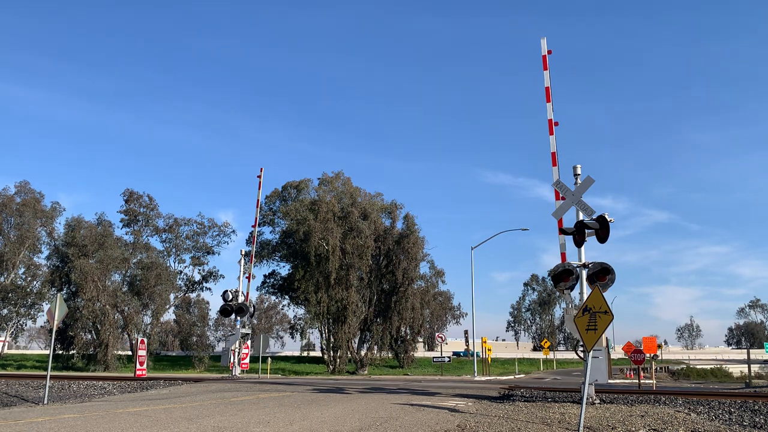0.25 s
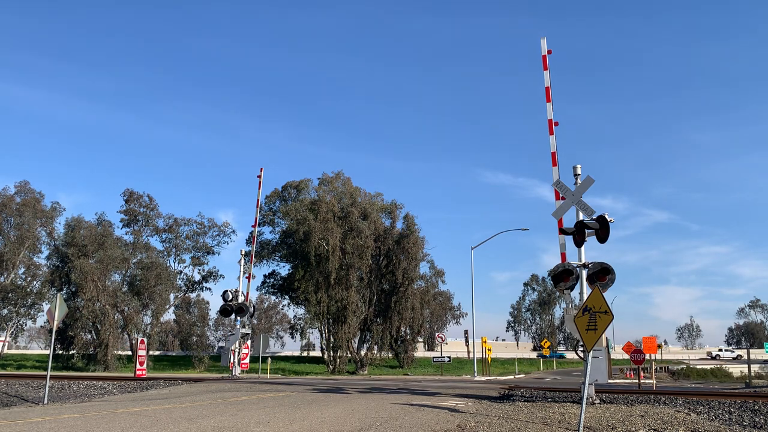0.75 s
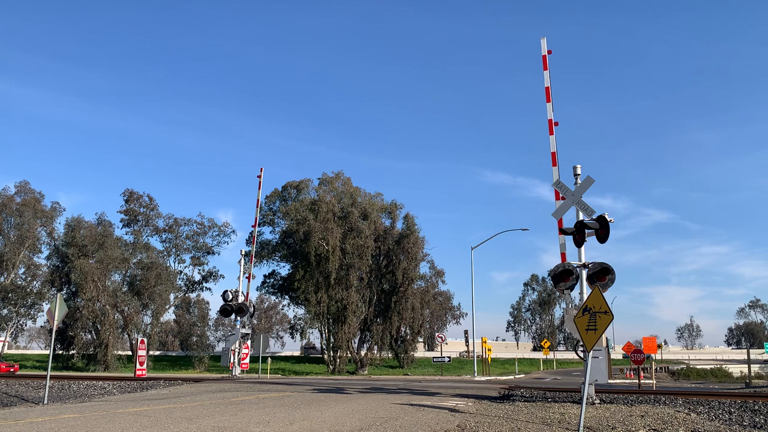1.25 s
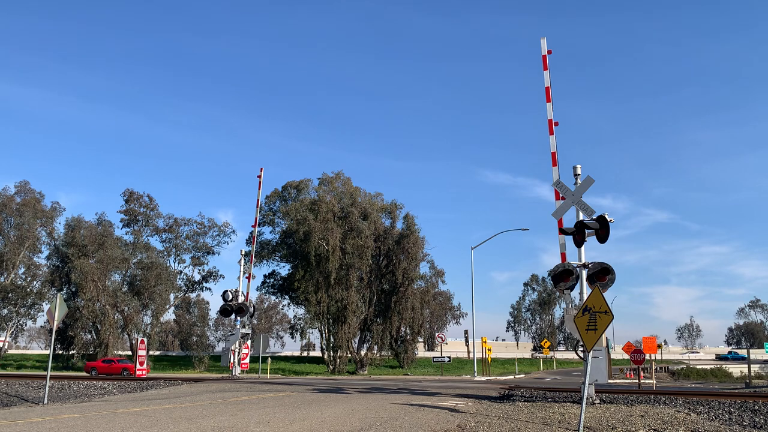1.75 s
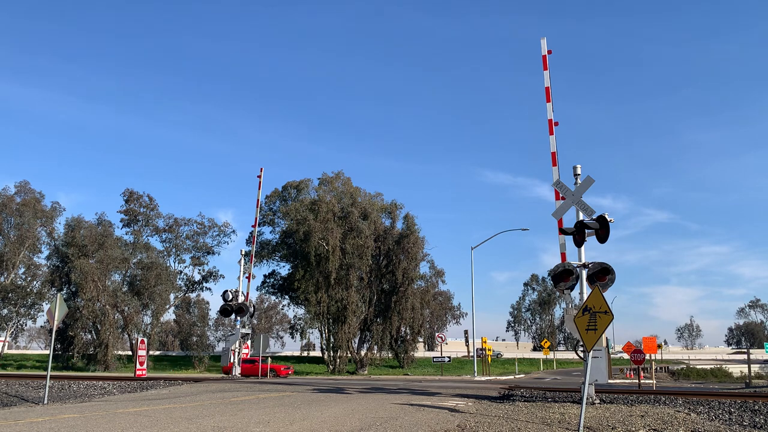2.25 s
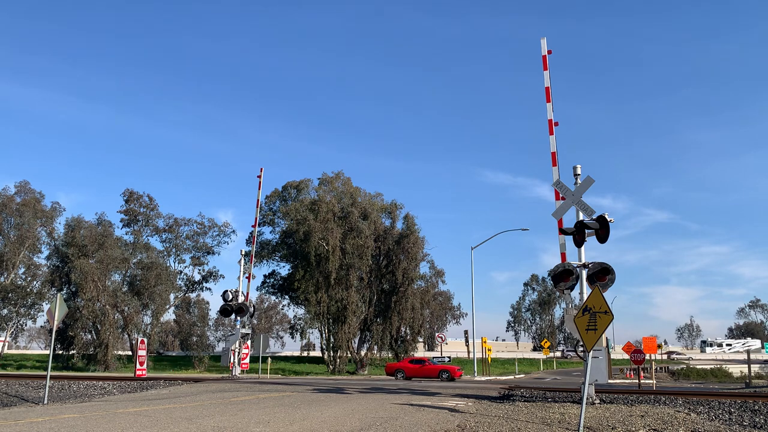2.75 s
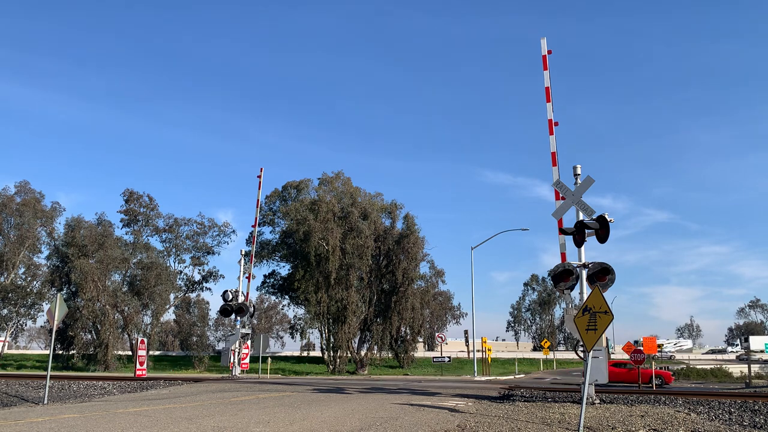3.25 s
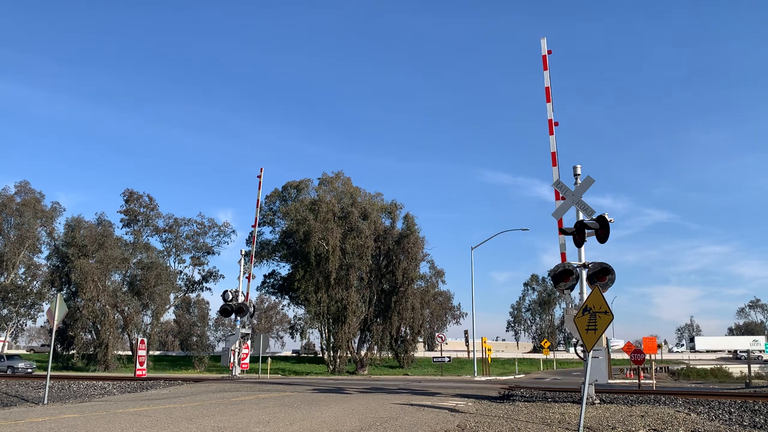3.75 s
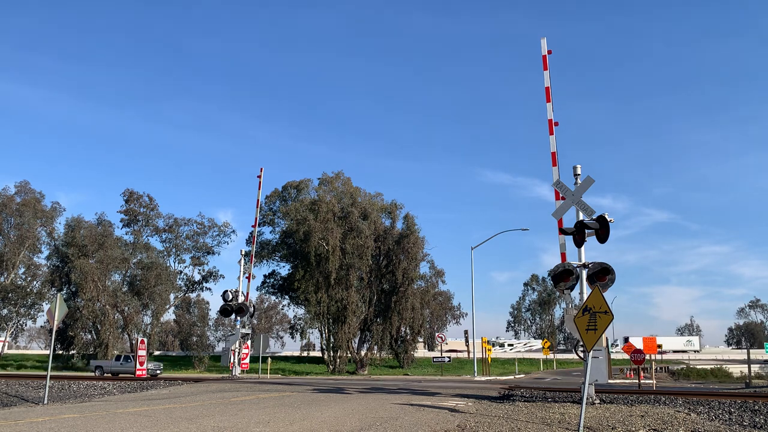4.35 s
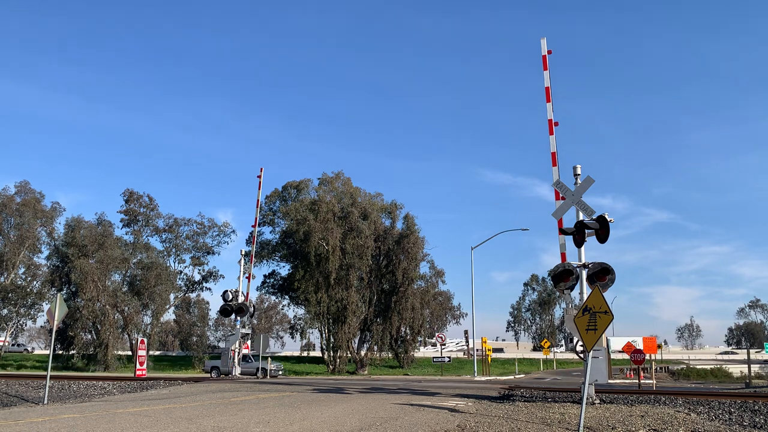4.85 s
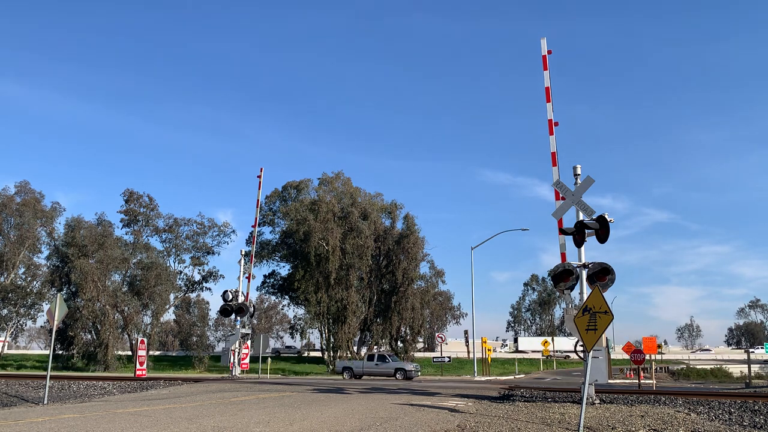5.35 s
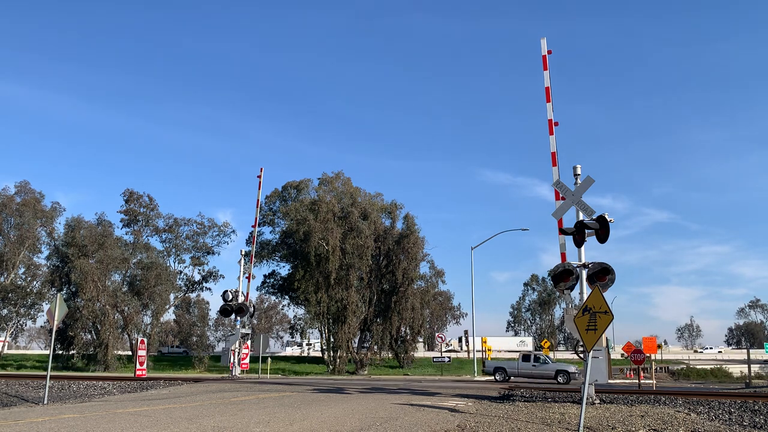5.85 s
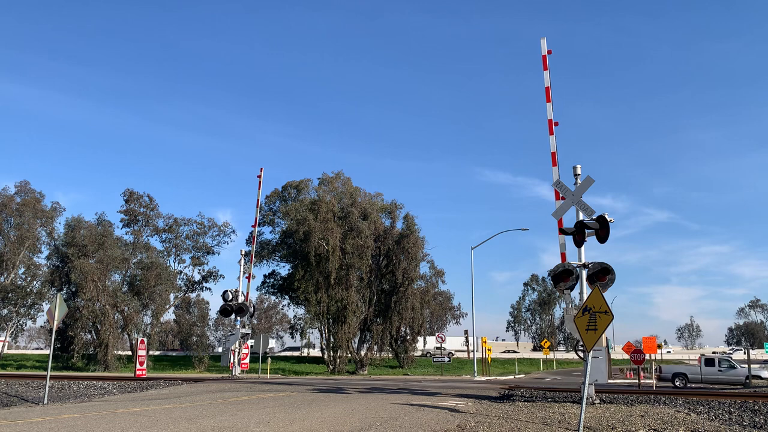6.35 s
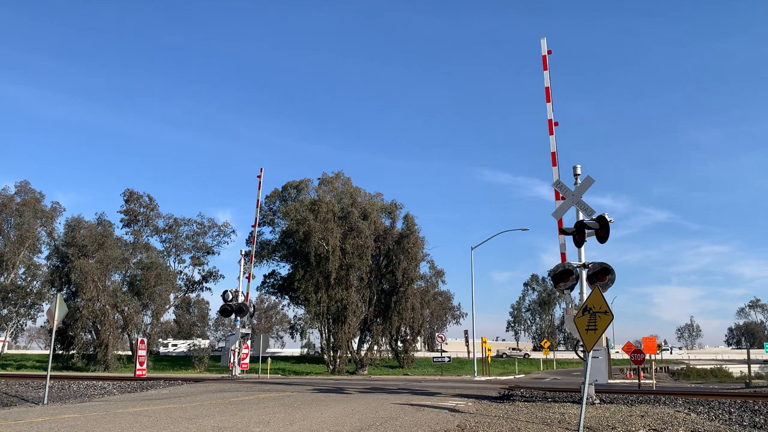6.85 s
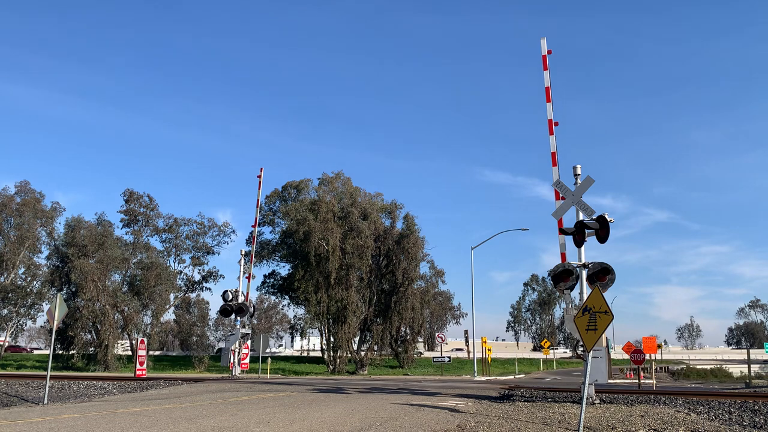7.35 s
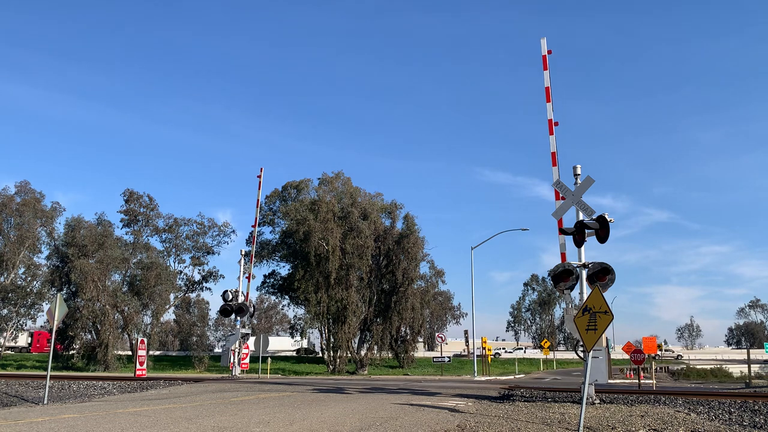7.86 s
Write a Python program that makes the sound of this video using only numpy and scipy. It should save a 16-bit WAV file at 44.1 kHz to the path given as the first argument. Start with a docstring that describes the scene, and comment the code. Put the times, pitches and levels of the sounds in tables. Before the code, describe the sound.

Distant traffic roar outdoors; a deep car exhaust climbs, whooshes by left to right and drones away, followed by a softer pickup pass.

```python
"""A country rail crossing, with steady highway traffic in the distance, heard by two microphones.
The highway is shaped noise, a low rumble under tyre roar; far truck exhausts are gliding harmonic drones.
On the near road a sports car revs up, passes left to right and drones away; a pickup follows.
Their tyres are swelling noise, the car's exhaust a sum of orders of its firing rate.
Faint rustles and ticks of gritty noise and thin, scratchy chirps sound over the roar."""
import sys
import numpy as np
from scipy import signal
from scipy.fft import rfft, irfft, next_fast_len
from scipy.io import wavfile
from scipy.ndimage import uniform_filter1d, map_coordinates

SR = 44100
rng = np.random.default_rng(int(sys.argv[2]) if len(sys.argv) > 2 else 0)


def store_wav(level_fs):
    """Save 16-bit WAV to argv[1]."""
    pcm = np.round(np.clip(np.atleast_2d(level_fs), -1, 1) * 32767)
    wavfile.write(sys.argv[1], SR, pcm.T.astype(np.int16))


N = 358091

# density of the highway traffic: time_s, rumble_db, tyre_roar_db, body_db (gain of the roar under 700 Hz)
HIGHWAY_FLOW = [(0, -32, -36, -3.5), (.9, -32.5, -35, -2.5), (1.7, -31, -36.5, -1.5),
                (2.3, -31.5, -36.5, 0), (3.4, -28, -38.5, -3), (4.3, -30.7, -36, -1.8),
                (5.4, -31, -37.5, -0.5), (6.3, -30.3, -37.5, 1.2), (7.3, -28.5, -38.5, 0),
                (8.12, -30.5, -37, 1)]
# spectrum of the distant engines: frequency_hz, density_db (per Hz)
RUMBLE_SPECTRUM = [(20, -43), (30, -22.5), (38, -7), (47, -1), (58, -2.5), (75, 1.5), (100, .5), (125, -3),
                   (155, -5), (190, -9.5), (250, -15.5), (400, -37.5), (900, -69.5)]
# spectrum of the distant tyres: frequency_hz, density_db (per Hz)
ROAR_SPECTRUM = [(120, -17.5), (260, -3), (420, 0), (650, 1.5), (930, 1), (1300, -4), (1800, -8),
                 (2500, -14), (3200, -20.5), (4200, -25), (5300, -32), (6700, -37), (7800, -57.5),
                 (12000, -72)]
ROAR_PATCHY_DB = 1.4

# engine and tyre notes of passing trucks: loudest_s, half_width_s, flank_steepness,
# pitch_hz (at the loudest), glide_hz_per_s, level_db, side (-1 left to 1 right)
TRUCK_DRONES = [(.15, .3, 3, 162.5, -3.5, -40.5, 0), (.65, 0.37, 2.3, 327.4, -1, -47.5, -.87),
                (1.05, 0.43, 1.7, 96.1, -1.56, -25.5, -.5), (1.4, 0.47, 3, 174.9, -.5, -40.5, .1),
                (1.35, 0.69, 2.5, 143.2, -2.5, -31.5, 0.48), (1.55, .22, 3, 159.8, -1.5, -36, 0),
                (1.87, .14, 3, 190.5, 5.5, -40.5, 0), (2.45, .45, 3.6, 81.33, 0, -33.5, -0.93),
                (2.6, .39, 3, 94.9, 0, -35, -.46), (4.05, 0.37, 3.3, 147.5, 0.25, -23, .31),
                (4.152, 0.48, 2.4, 222.4, -2.5, -45, -.29), (5.5, 1, 2.5, 92.9, 0, -35, .8),
                (5.521, .36, 1.9, 217.7, -2.5, -34, -.3), (5.6, .55, 2.6, 151.4, 0, -39.5, 0.37),
                (6.33, .14, 4, 399.5, -5, -47, .29), (6.5, 0.56, 3, 443.6, -2, -52, 0.31),
                (6.5, .15, 4.4, 170.6, 0, -31.5, .36), (7.41, 0.12, 4.5, 164.9, -18.5, -33.5, 0.61),
                (8, .2, 3, 455.8, -1, -49, .4), (8.1, .38, 2, 145.5, -2, -35.5, 0.28),
                (8.08, 0.37, 1.4, 209.7, -3, -28.5, 0.28)]
# harmonics of a truck note: multiple (of its pitch), level_db
TRUCK_HARMONICS = [(1, 0), (2, -34)]
# cruising engines fire evenly, but moving air shakes higher notes more
TRUCK_FLUTTER_DB, TRUCK_JITTER_RAD, STEADY_BELOW_HZ = .5, .04, 200
# a slow diesel on the highway: loudest_s, half_width_s, flank_steepness,
# pitch_hz (at the loudest), glide_hz_per_s, level_db
SLOW_DIESEL = (0.54, 2.7, 3.5, 82, -.5, -36.5)
# harmonics of the diesel: multiple (of its pitch), level_db
DIESEL_HARMONICS = [(1, 0.5), (2, -2), (3, -25.5), (4, -14.5), (5, -17.5), (6, -15.5)]
DIESEL_SIDE = -0.62  # -1 left to 1 right
# its overtones die away as it drives off
DIESEL_OVERTONES_DB, DIESEL_DULLING_DB_PER_S = -4.5, 0.5

# gritty rustles: middle_s, width_s, level_db
RUSTLE_SWELLS = [(.93, .11, -56), (1.4, .04, -59.5), (1.8, 0.056, -61), (2.52, .041, -59.5),
                 (3.04, .13, -63.5), (3.41, .075, -56), (3.535, 0.039, -54.5), (3.75, .2, -61.5),
                 (4.16, .12, -57), (5.361, .029, -53), (6.33, .12, -61), (7.07, 0.037, -63.5),
                 (7.45, 0.25, -62), (8.06, 0.16, -60.5)]
# spectrum of the rustles: frequency_hz, density_db (per Hz)
GRIT_SPECTRUM = [(1200, -11), (2500, 9), (3800, 3.5), (5200, 1.5), (6600, 0), (7800, -21.5), (10000, -26.5),
                 (12000, -40)]
GRIT_PATCHY_DB = 2.2
STIR_DB, STIR_SWING_DB = -75.5, 1.5  # fainter rustling comes and goes between them
# dry ticks: start_s, level_db
DRY_TICKS = [(1.778, -50), (3.061, -51), (3.531, -51.5), (6.434, -44.5)]
# spectrum of a tick: frequency_hz, density_db (per Hz)
TICK_SPECTRUM = [(1500, -11), (2800, 5.5), (3650, 5), (4800, -2.5), (6200, 1.5), (7200, -10), (8500, -29),
                 (12000, -41.5)]
TICK_T60_S = .026  # time to fall by 60 dB

# faint thin chirps: middle_s, width_s, pitch_hz, level_db
THIN_CHIRPS = [(5.335, 0.023, 5115, -61.5), (5.412, .02, 5040, -60), (6.217, 0.0066, 4760, -59),
               (6.214, 0.009, 6180, -57.5), (6.24, .024, 6450, -66.5), (6.24, .025, 7470, -65)]
# spectrum of the hiss around a chirp: frequency_hz, density_db (per Hz)
PUFF_SPECTRUM = [(3500, 1), (5500, -3), (7500, 3), (8300, -27.5), (9500, -17), (11500, -17.5)]
# the thin upper tone that all chirps share, and the hiss, relative to the chirp
SQUEAK_HZ, SQUEAK_DB, PUFF_DB = 7250, -12, -4

# near vehicles, the car then the pickup: closest_s, reach_s (distance over speed), tyre_db, bass_db,
# treble_db, behind_db (tyres from behind), tailpipe_s (facing us), resonance_hz, chuff_db
NEAR_PASSES = [(2.85, .32, -34.5, -1, 0, -45, 3.42, 249, -38.5),
               (5.54, 0.31, -36, -1.5, -2.5, -46.5, 6.3, 206.6, -37.5)]
# spectrum of the near tyres: frequency_hz, density_db (per Hz)
TYRE_SPECTRUM = [(100, -10), (250, 1.5), (420, 2), (540, 0.5), (700, 3.5), (1100, -1.5), (1600, -6),
                 (2400, -13), (3300, -19.5), (4500, -28), (6500, -38), (8000, -55.5), (12000, -46.5)]
# coarse asphalt makes the tyre noise grainy
TYRE_PATCHY_DB, TREAD_GRAIN_DB = 1.3, .8
HISS_ABOVE_HZ, HISS_LATE_S = 1700, 0.096  # the tyres' treble peaks just after the closest point
# spectrum of the tyre hiss thrown backwards: frequency_hz, density_db (per Hz)
BEHIND_SPECTRUM = [(200, -9.5), (450, 2.5), (900, 0), (1600, -1), (2400, -10), (3300, -16), (4500, -18.5),
                   (6500, -29), (8000, -47.5), (12000, -56.5)]
BEHIND_S, BEHIND_WIDTH_S = 0.91, 0.67  # it is loudest this long after the pass
# spectrum of the tailpipe: multiple (of the pipe's resonance), density_db (per Hz)
TAILPIPE_SPECTRUM = [(.45, -20.5), (.75, -4.5), (1, 6), (1.2, -4.5), (1.5, -12.5), (2.2, -23), (4.5, -59.5)]

# the sports car's engine: time_s, firing_rate_hz, exhaust_level_db
CAR_ENGINE = [(0, 88.74, -27.5), (.2, 91.3, -24), (.33, 97.1, -24), (.5, 103.9, -29), (.63, 112.9, -28),
              (.85, 121.7, -26), (1.03, 125.3, -25.8), (1.42, 114.8, -21.5), (1.76, 111.8, -23),
              (2.4, 109.3, -19), (2.65, 104.6, -24.5), (2.87, 107.6, -25.5), (3.1, 106.1, -26),
              (3.35, 99.94, -23.5), (3.55, 89.26, -25.5), (3.8, 81.6, -24.5), (4.6, 78.1, -22),
              (5.3, 76.6, -23.5), (6.2, 75.25, -25.5), (6.8, 80.54, -23), (7.1, 77.38, -25.5),
              (7.55, 76.93, -26.5), (8.12, 77.2, -22.5)]
# orders of the car's exhaust: multiple (of the firing rate), level_db
CAR_EXHAUST_ORDERS = [(1, -1), (1.5, -31.5), (2, -18), (2.5, -28.5), (3, -23.5), (4, -27), (5, -32)]
# the car's deep note drops away briefly: middle_s, half_width_s, depth_db
DEEP_NOTE_DIPS = [(0.431, 0.064, 13), (2.8, 0.24, 10.5)]
OVERTONES_DB = -36.5  # level of the car's overtones from afar
BARK_S, BARK_WIDTH_S, BARK_DB = 2.9, .5, 16.5  # they swell while the car is closest

# sound from the side reaches the two microphones in and out of step: frequency_hz, likeness (-1 to 1)
MIC_LIKENESS = [(40, .96), (100, .9), (250, .88), (420, .6), (600, 0), (800, -.2), (1100, -.27),
                (1550, -.52), (2000, -.22), (2600, .3), (3400, -.1), (4300, .25), (5400, -.28), (6400, .65),
                (7600, 0)]
# balance of the two microphones: frequency_hz, right_over_left_db
MIC_LEAN = [(170, 2.5), (300, .6), (500, 0), (2400, -.4), (4000, 2.5), (6500, 4.5), (9000, 0)]
# delay between the microphones for a sound from the side; long waves bend round the housing
BASS_LAG_S, TREBLE_LAG_S = 0.00065, 0.00023
SWING_S = 1  # time a near vehicle takes to swing well to one side
TOP_HZ = 11800  # upper band limit


def amp(db):
    """Decibels to gain."""
    return 10 ** (np.asarray(db) / 20)


def unit(x):
    """Scale to rms 1."""
    return x / np.sqrt(np.mean(x ** 2) + 1e-20)


def clock():
    """The time of every sample in seconds."""
    return np.arange(N) / SR


def along(points, hz):
    """Read (Hz, value) points on a log axis."""
    f, v = np.transpose(points)
    return np.interp(np.log(hz + 1), np.log(f + 1), v)


def curves(rows):
    """One value per sample for each column after the time."""
    s, *columns = np.transpose(rows)
    return [np.interp(clock(), s, column) for column in columns]


def wobble(rate):
    """A smooth random curve, rate knots a second."""
    knots = rng.standard_normal(int(N * rate / SR) + 4)
    return map_coordinates(knots, [clock() * rate], mode="nearest")


def bell(s, width):
    """A smooth rise and fall around time s, 1 at its top."""
    return np.exp(-((clock() - s) / width) ** 2)


def filtered(x, response):
    """Multiply the spectrum of x by a response of frequency."""
    m = next_fast_len(N + 8192)
    return irfft(rfft(x, m) * response(np.fft.rfftfreq(m, 1 / SR)), m)[..., :N]


def coloured(x, spectrum):
    """x through a (Hz, dB) spectrum, at rms 1."""
    return unit(filtered(x, lambda hz: amp(along(spectrum, hz))))


def rush(spectrum, patchy_db):
    """Wide outdoor noise of rms 1, slightly lumpy: narrow patches of it fade in and out."""
    z = signal.stft(rng.standard_normal((2, N)), nperseg=512)[2]
    field = rng.standard_normal(z.shape[1:])
    field = uniform_filter1d(field, size=2, axis=0)  # neighbouring frequencies
    field = uniform_filter1d(field, size=14, axis=1)  # neighbouring moments
    pair = signal.istft(z * amp(patchy_db * unit(field)), nperseg=512)[1][:, :N]

    def mid_side_gains(hz):
        # this split of mid and side gives the wanted likeness of left and right
        turn = np.arccos(np.clip(along(MIC_LIKENESS, hz), -1, 1)) / 2
        return np.array([np.cos(turn), np.sin(turn)])

    mid, side = filtered(pair, mid_side_gains)
    return coloured(np.array([mid + side, mid - side]), spectrum)


def placed(x, lag_s):
    """Stereo pair in which the left microphone hears x later by lag_s."""
    t = clock()
    left = np.interp(t - lag_s / 2, t, x)
    right = np.interp(t + lag_s / 2, t, x)
    return np.array([left, right])


def bearing(s):
    """Side of a near vehicle that passes at time s, from -1 left to 1 right."""
    past = clock() - s
    return past / np.hypot(SWING_S, past)


def drive_by(row):
    """Pitch and gain of a far vehicle: its note glides steadily while it swells and fades."""
    s, width, steepness, hz, glide, db = row
    since = clock() - s
    return hz + glide * since, amp(db) / np.hypot(1, np.abs(since / width) ** steepness)


def exhaust(hz, orders, flutter_db, jitter, overtones_db=0):
    """Orders of a firing rate; uneven firing shakes their strength and phase."""
    phase = 2 * np.pi * (np.cumsum(hz) / SR + rng.random()) + jitter * wobble(22)
    note = np.zeros(N)
    for order, db in orders:
        # reflections off the ground make the overtones fade in and out
        fading_db = overtones_db + 2 * wobble(4) if order > 1 else 0
        note += amp(db + fading_db) * np.sin(order * phase)
    return np.sqrt(2) * note * amp(flutter_db * wobble(13))


def highway():
    """Many engines merge into a rumble, many tyres into a roar; heavy vehicles give the roar more body."""
    rumble_db, roar_db, body_db = curves(HIGHWAY_FLOW)
    roar = rush(ROAR_SPECTRUM, ROAR_PATCHY_DB)
    body = filtered(roar, lambda hz: 1 / (1 + (hz / 700) ** 6))
    roar = roar + (amp(body_db) - 1) * body
    rumble = amp(rumble_db) * rush(RUMBLE_SPECTRUM, patchy_db=0.2)
    return rumble + amp(roar_db + 0.3 * wobble(7)) * roar


def trucks():
    """Far exhausts drone and beat against each other."""
    hz, gain = drive_by(SLOW_DIESEL)
    overtones_db = DIESEL_OVERTONES_DB - DIESEL_DULLING_DB_PER_S * (clock() - SLOW_DIESEL[0])
    diesel = gain * exhaust(hz, DIESEL_HARMONICS, TRUCK_FLUTTER_DB, TRUCK_JITTER_RAD, overtones_db)
    out = placed(diesel, BASS_LAG_S * DIESEL_SIDE)
    for *row, side in TRUCK_DRONES:
        hz, gain = drive_by(row)
        shake = np.maximum(1, hz / STEADY_BELOW_HZ) ** 2
        drone = exhaust(hz, TRUCK_HARMONICS, shake * TRUCK_FLUTTER_DB, shake * TRUCK_JITTER_RAD)
        out += placed(gain * drone, BASS_LAG_S * side)
    return out


def rustles():
    """Gritty swells of hiss, and dry ticks that start at once and decay exponentially."""
    t = clock()
    swell = amp(STIR_DB + STIR_SWING_DB * wobble(7.7))
    swell = swell + sum(amp(db) * bell(s, width) for s, width, db in RUSTLE_SWELLS)
    grain = unit(amp(1.7 * wobble(130)))
    ticks = sum(amp(db - 60 * np.abs(t - s) / TICK_T60_S) * (t >= s) for s, db in DRY_TICKS)
    grit = swell * grain * rush(GRIT_SPECTRUM, GRIT_PATCHY_DB)
    return grit + ticks * rush(TICK_SPECTRUM, patchy_db=1.5)


def chirps():
    """Short, high, scratchy notes of unsteady pitch, each in a puff of hiss."""
    def tone(hz):
        unsteady_hz = hz * (1 + 0.013 * wobble(390))
        return np.sin(2 * np.pi * np.cumsum(unsteady_hz) / SR)

    notes, puffs = np.zeros(N), np.zeros(N)
    for s, width, hz, db in THIN_CHIRPS:
        swell = amp(db) * bell(s, width)
        notes += swell * tone(hz)
        puffs += swell
    squeak = amp(SQUEAK_DB) * tone(SQUEAK_HZ)
    hiss = amp(PUFF_DB) * rush(PUFF_SPECTRUM, patchy_db=4.5)
    return notes + puffs * (squeak + hiss)


def near_vehicles():
    """Tyre noise swells, swings left to right and lingers behind; the tailpipe turns to us and chuffs."""
    t, out = clock(), np.zeros((2, N))
    for s, reach, db, bass_db, treble_db, behind_db, pipe_s, pipe_hz, pipe_db in NEAR_PASSES:
        lag_s = TREBLE_LAG_S * bearing(s)
        tilt = [(350, bass_db), (750, 0.0039), (1400, treble_db)]
        spectrum = [(hz, level + along(tilt, hz)) for hz, level in TYRE_SPECTRUM]
        direct = placed(rush(spectrum, TYRE_PATCHY_DB)[0], lag_s)
        scattered = amp(-9.5) * rush(spectrum, TYRE_PATCHY_DB)
        tread = unit((direct + scattered) * amp(TREAD_GRAIN_DB * wobble(160)))
        body = filtered(tread, lambda hz: 1 / (1 + (hz / HISS_ABOVE_HZ) ** 4))

        def swell(peak_s):
            # trees screen the road on both sides: the swell rises and falls steeply
            return amp(db) / np.hypot(1, np.abs((t - peak_s) / reach) ** 2.2)

        out += swell(s) * body + swell(s + HISS_LATE_S) * (tread - body)
        # tyres throw their hiss backwards
        behind = placed(coloured(rng.standard_normal(N), BEHIND_SPECTRUM), lag_s)
        out += amp(behind_db) * bell(s + BEHIND_S, BEHIND_WIDTH_S) * behind
        pipe_spectrum = [(k * pipe_hz, level) for k, level in TAILPIPE_SPECTRUM]
        pipe_swell = amp(pipe_db) / np.hypot(1, ((t - pipe_s) / .15) ** 2)
        out += pipe_swell * rush(pipe_spectrum, patchy_db=2.5)
    return out


def sports_car():
    """The exhaust note climbs, barks brightly as the car passes, then falls as it eases off."""
    hz, db = curves(CAR_ENGINE)
    db = db - sum(depth_db * bell(s, width) for s, width, depth_db in DEEP_NOTE_DIPS)
    overtones_db = OVERTONES_DB + BARK_DB * bell(BARK_S, BARK_WIDTH_S)
    # subtracting db keeps the overtones independent of the deep note's level
    note = exhaust(hz, CAR_EXHAUST_ORDERS, flutter_db=.5, jitter=0.022, overtones_db=overtones_db - db)
    return placed(amp(db) * note, BASS_LAG_S * bearing(NEAR_PASSES[0][0]))


def scene():
    """The far highway, the small sounds over it and the near road."""
    return highway() + trucks() + rustles() + chirps() + near_vehicles() + sports_car()


def record(dry):
    """The right microphone hears more bass and treble; nothing passes above the band limit."""
    soft_ends = np.clip(np.minimum(clock(), clock()[::-1]) / .004, 0, 1)
    return filtered(dry * soft_ends, lambda hz: amp(np.outer([-.5, .5], along(MIC_LEAN, hz))) * (hz < TOP_HZ))


dry = scene()
out = record(dry)
store_wav(out)
```